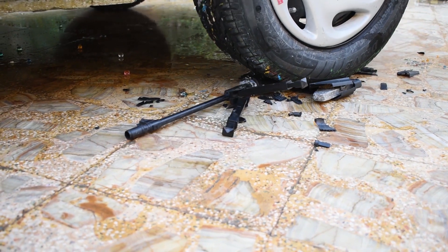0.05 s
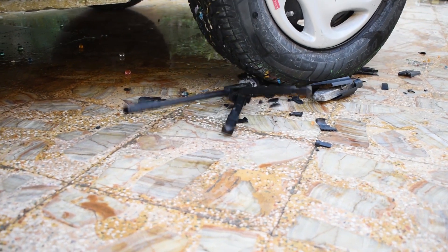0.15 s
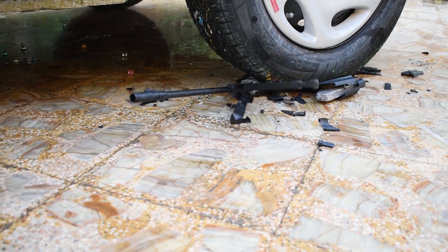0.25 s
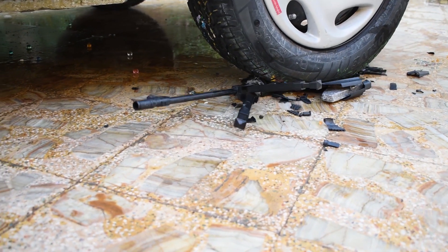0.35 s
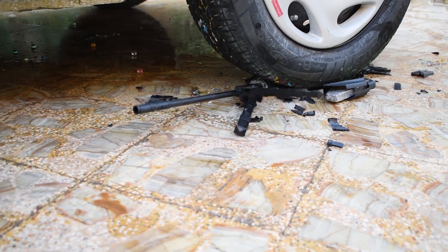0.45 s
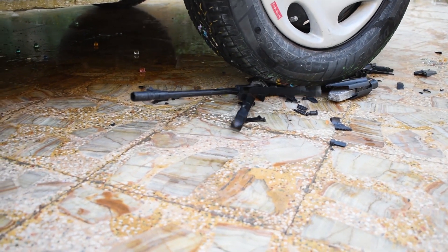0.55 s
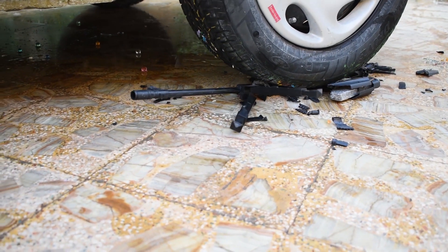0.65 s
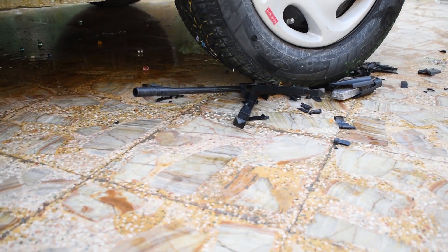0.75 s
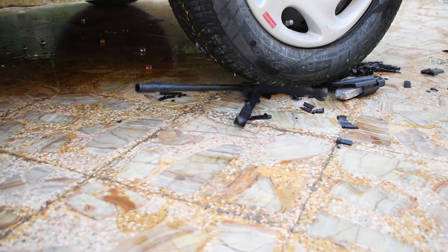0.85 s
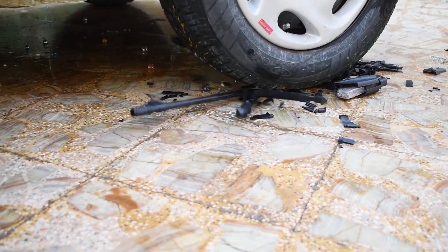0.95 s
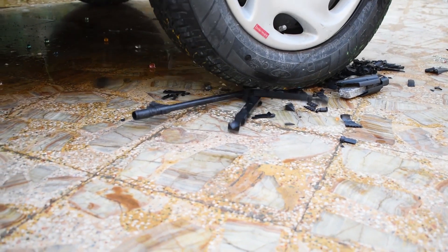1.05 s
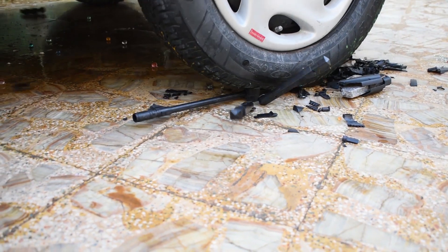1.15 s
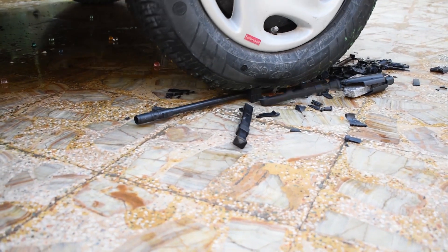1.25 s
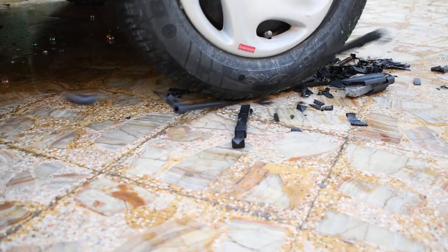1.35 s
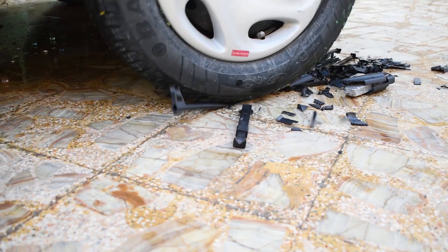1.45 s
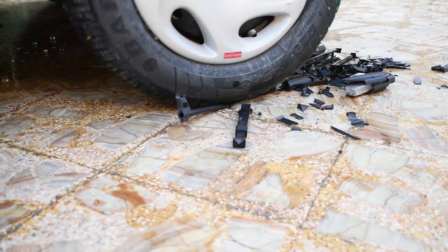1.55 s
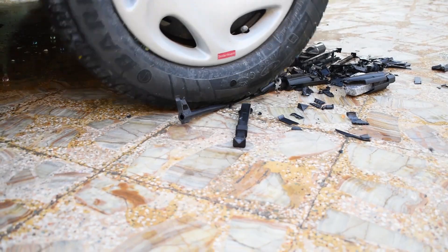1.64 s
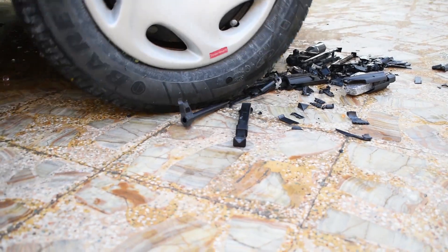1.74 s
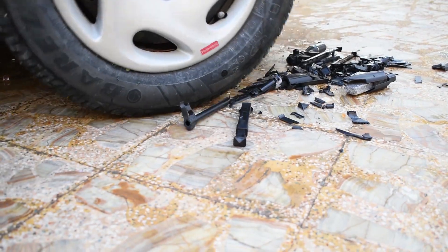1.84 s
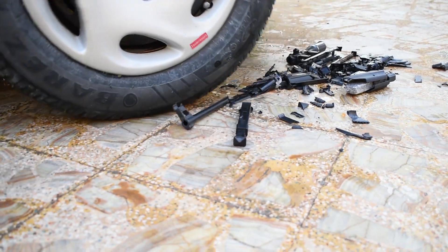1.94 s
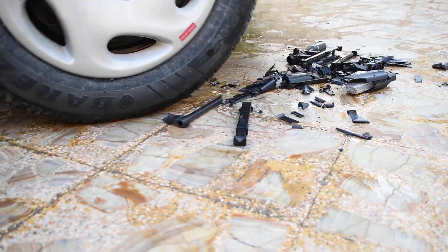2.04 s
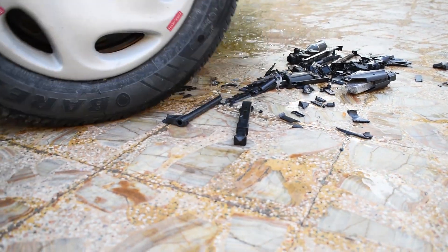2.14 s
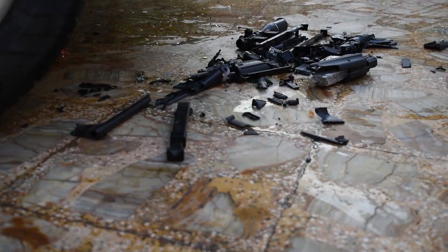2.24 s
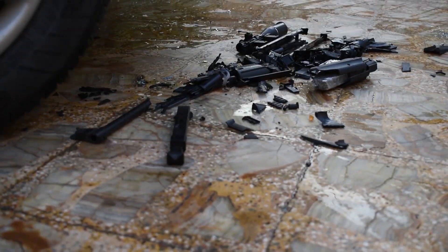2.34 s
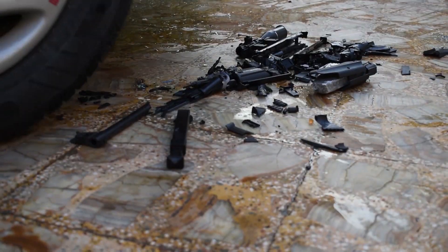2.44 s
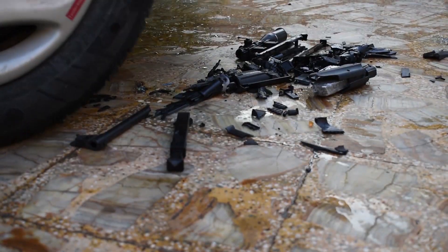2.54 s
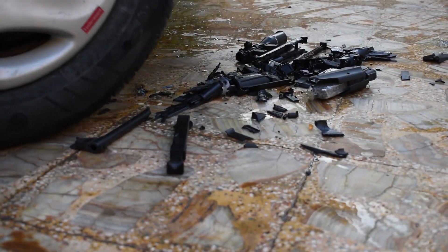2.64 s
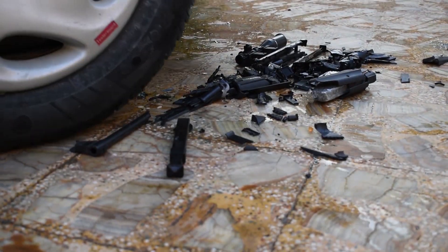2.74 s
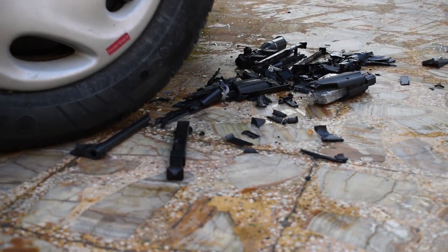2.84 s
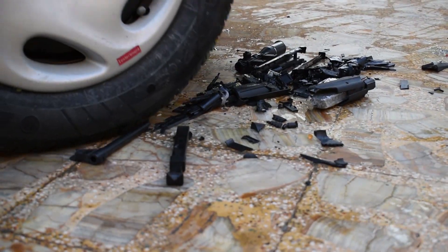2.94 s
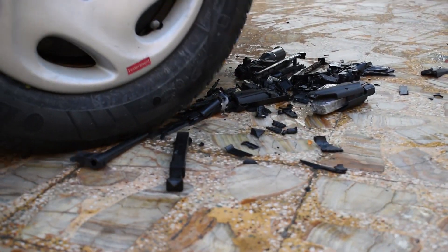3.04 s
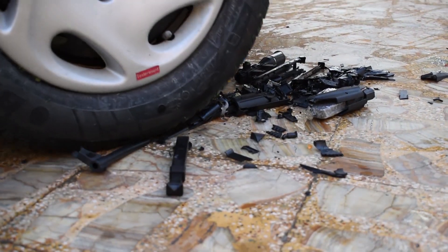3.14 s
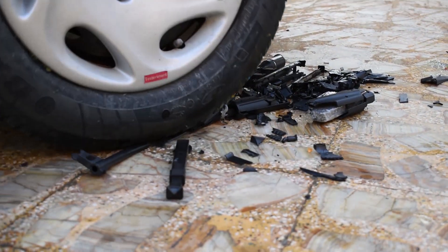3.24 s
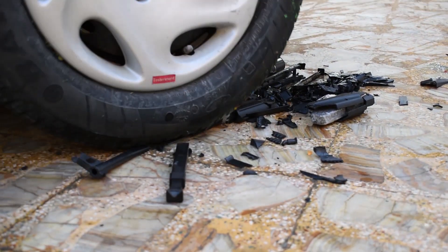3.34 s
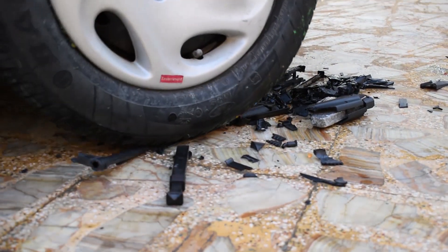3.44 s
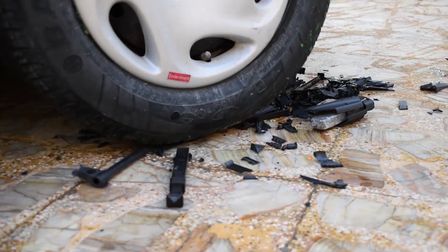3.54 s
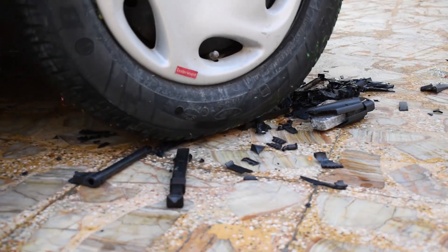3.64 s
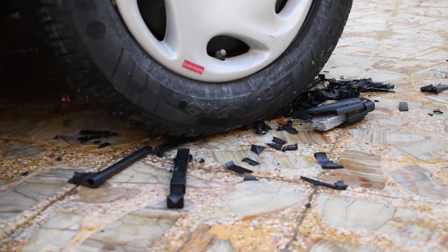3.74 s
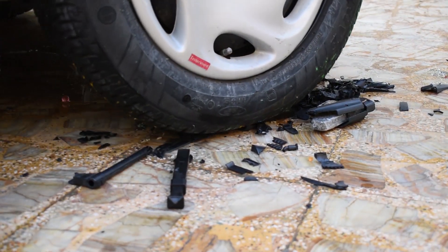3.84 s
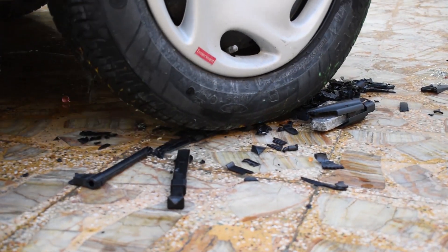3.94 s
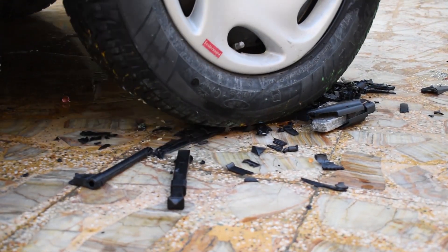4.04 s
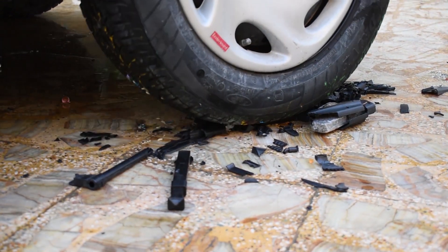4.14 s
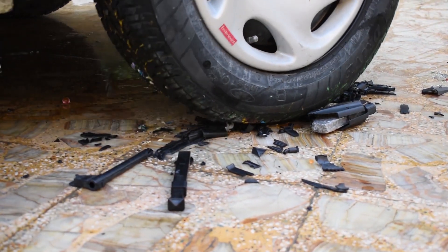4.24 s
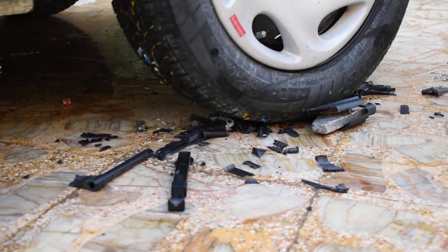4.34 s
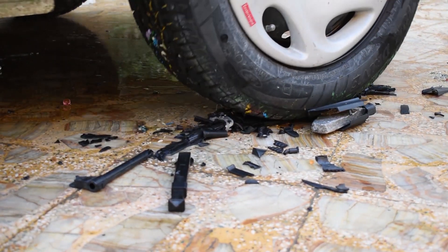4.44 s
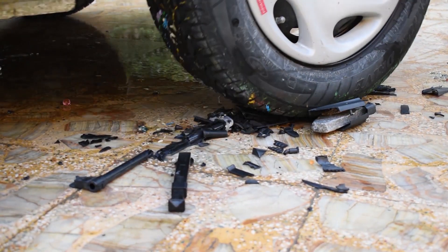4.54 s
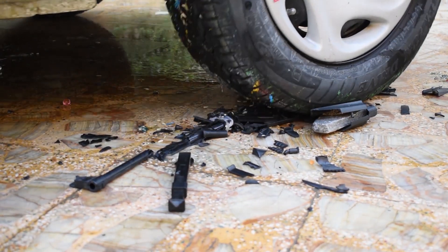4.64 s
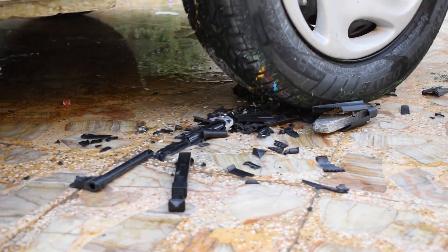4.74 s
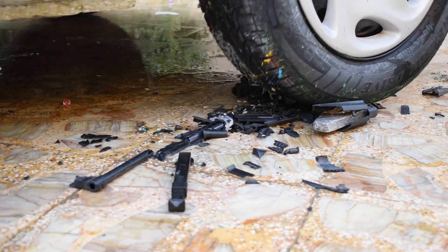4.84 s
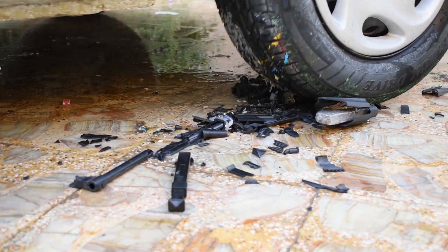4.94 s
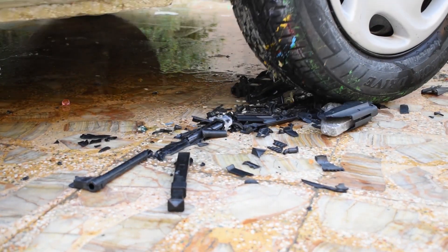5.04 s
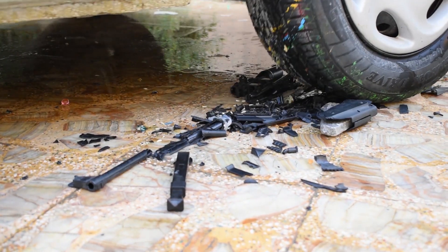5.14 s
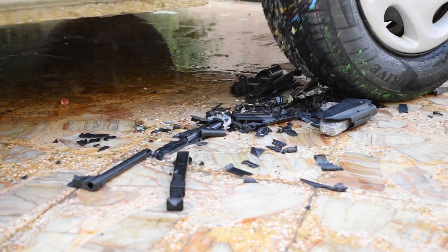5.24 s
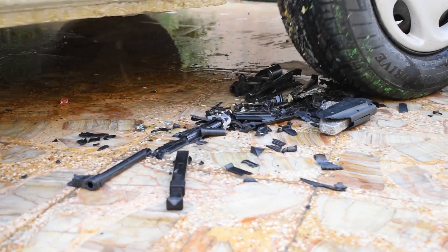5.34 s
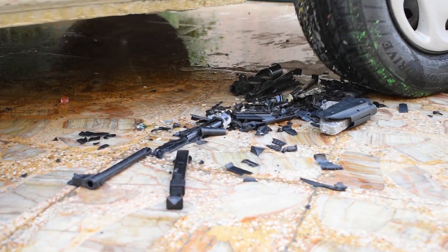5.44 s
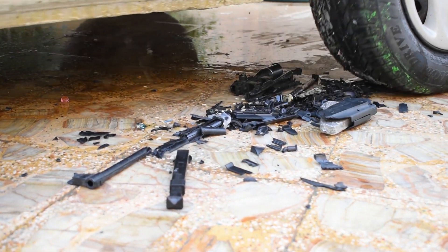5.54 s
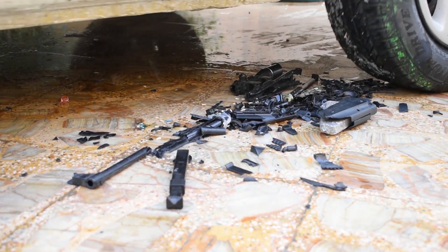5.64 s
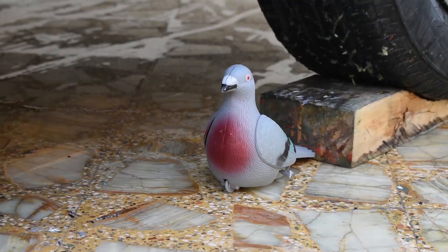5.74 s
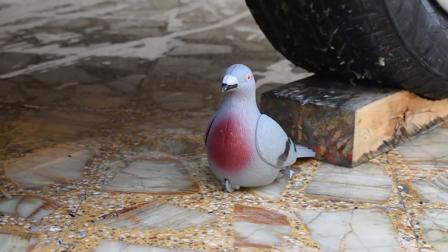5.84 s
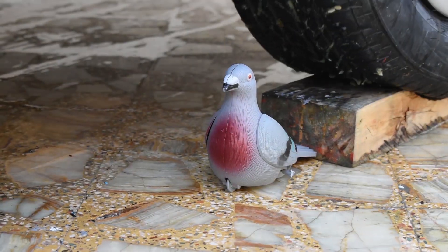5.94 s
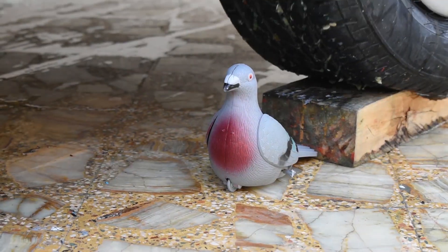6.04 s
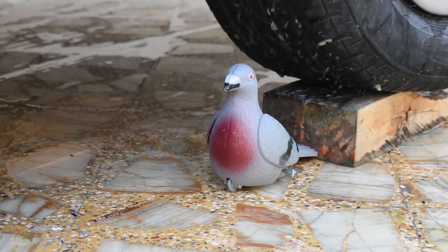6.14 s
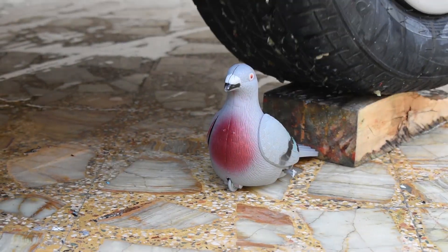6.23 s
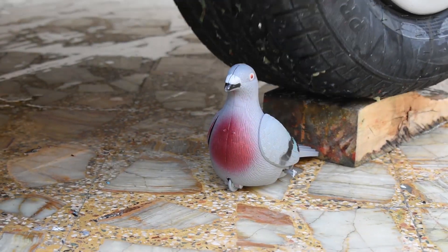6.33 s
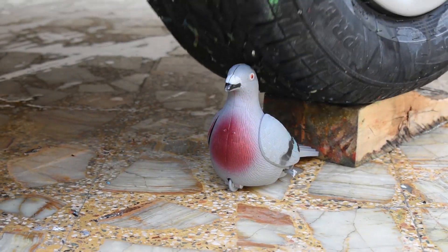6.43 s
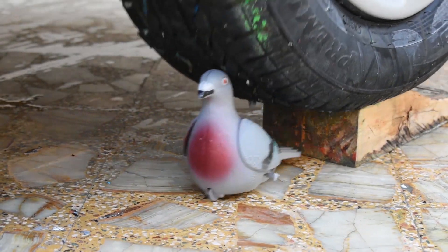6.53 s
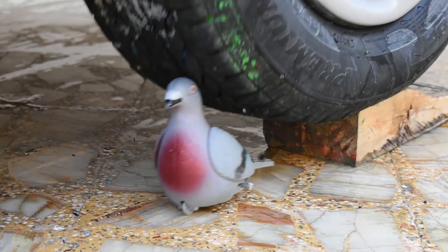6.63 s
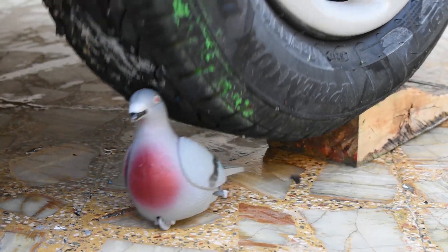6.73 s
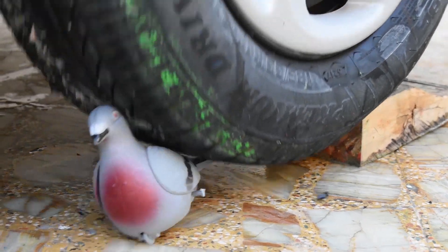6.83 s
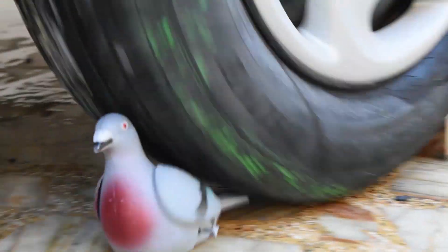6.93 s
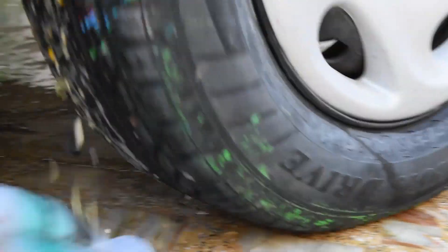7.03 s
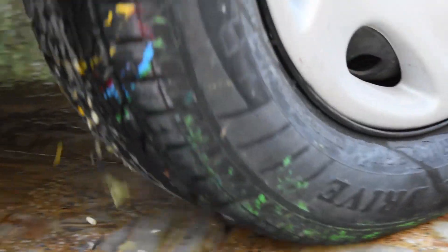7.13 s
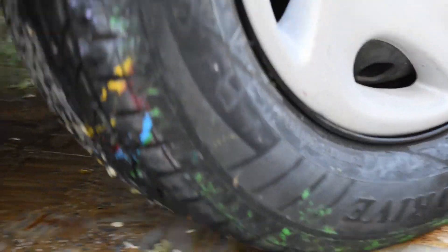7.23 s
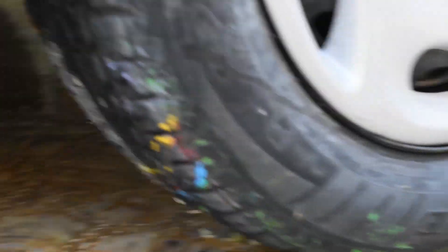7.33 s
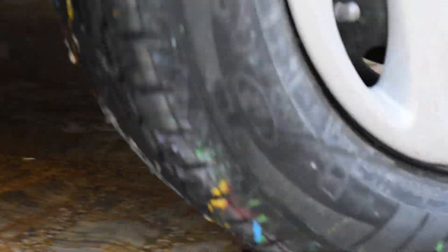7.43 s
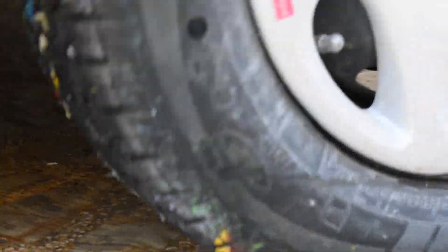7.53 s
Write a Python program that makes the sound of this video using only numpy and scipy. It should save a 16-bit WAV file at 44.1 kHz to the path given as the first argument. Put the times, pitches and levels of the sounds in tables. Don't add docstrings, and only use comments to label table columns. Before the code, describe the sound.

A car tyre creeps over brittle plastic toys on stone tiles, with loud pops, cracks and snapping chips over a low engine hum.

```python
import sys
import numpy as np
from scipy import signal
from scipy.fft import rfft, irfft, next_fast_len
from scipy.io import wavfile
from scipy.ndimage import uniform_filter1d

SR = 44100
rng = np.random.default_rng(int(sys.argv[2]) if len(sys.argv) > 2 else 0)


def volts_from_decibels(level):
    exponent = np.asarray(level, float) / 20
    return 10 ** exponent


def dump(signal):
    limited = np.clip(np.atleast_2d(signal).T, -1, 1)
    pcm = np.round(limited * 32767).astype(np.int16)
    wavfile.write(sys.argv[1], SR, pcm)


N = 334273
T = np.arange(N) / SR
# (time [s], firing rate [Hz], roar level [dB])
FIRING = [
    [(0, 65.12, -44), (.78998, 66.58, -46)],
    [(.79, 63.93, -45), (1.2, 60.5, -46), (2.0, 62.8, -48), (2.265, 61.37, -49)],
    [(2.268, 35.94, -55), (3.85, 31.08, -53), (4.25, 45.24, -47.5), (4.9, 55, -47), (5.5, 48.22, -49.5),
     (5.776, 48.86, -51)],
    [(5.806, 69.22, -43), (6.4, 70.5, -43), (6.51, 72.25, -43), (6.66, 65.47, -43.5), (6.9, 60.5, -46),
     (7.1, 55.47, -44), (7.58, 43, -48)],
]


def unit(x):
    return x / np.sqrt(np.mean(x ** 2) + 1e-20)


def takes(tables):
    s, *cols = np.concatenate(tables).T
    gate = sum((T >= rows[0][0]) & (T <= rows[-1][0]) for rows in tables)
    return [np.interp(T, s, c) for c in cols] + [gate]


def ring(f, hz, width):
    return 1j * f * width / (hz * hz - f * f + 1j * f * width)


def filtered(x, response):
    m = next_fast_len(x.shape[-1] + 1024)
    return irfft(rfft(x, m) * response(np.fft.rfftfreq(m, 1 / SR)), m)[..., :x.shape[-1]]


def wobble(rate, shape=(1, N)):
    knots = rng.standard_normal((shape[0], int(shape[1] * rate / SR) + 4))
    part, whole = np.modf(np.arange(shape[1]) * rate / SR)
    whole = whole.astype(int)
    return knots[:, whole] * (1 - part) + knots[:, whole + 1] * part


def place(seconds, rows):
    at = np.round(seconds * SR).astype(int)[:, None] + np.arange(rows.shape[1])
    return np.bincount(at.ravel(), rows.ravel(), N + SR)[:N]


def bursts(db, response, room, tear, tail_db, t60, lumpy_db, tail_lumps=0.22, release=0):
    t = np.arange(SR // 8) / SR
    head_n = SR // 25
    white = rng.standard_normal((len(db), len(t)))
    lumps_db = lumpy_db * wobble(600, (len(db), len(t)))
    noise = white * volts_from_decibels(lumps_db)
    near = volts_from_decibels(-60 * t / (t60 * (tear / 0.0016) ** 0.042))
    fade = near + 0.17 * volts_from_decibels(-60 * t / (5.6 * t60))
    tearing = (noise * np.exp(-(t / tear) ** 1.5) * np.tanh(6 * t / tear))[:, :head_n]
    jolt = np.exp(-((t[:head_n] - .0005 - .3 * tear) / 0.000097) ** 2)
    tearing += release * np.sqrt(SR * tear) / 9 * jolt
    head = filtered(tearing, response)
    onset = 1 - np.exp(-t / 0.00076)
    echoes = filtered(white * volts_from_decibels(tail_lumps * lumps_db) * fade * onset, room)
    size = lambda rows: np.sqrt(np.sum(rows ** 2, axis=1, keepdims=True))
    rows = volts_from_decibels(tail_db) * echoes / size(echoes)
    rows[:, :head_n] += head / size(head)
    return rows * volts_from_decibels(db)[:, None] * np.sqrt(SR * tear + 30)


def engine():
    # (multiple of firing rate [1], level [dB])
    orders = [(2, -17), (3, -10), (4, -6), (5, -26.5), (3.5, -19.5), (8, -13), (8.5, -14), (9, -13)]
    # (frequency [Hz], density [dB per Hz])
    roar_spectrum = [(53, -20.5), (100, -21), (125, -11), (210, -3), (620, -13), (1270, -9.5), (5300, -23),
                     (16000, -69.5)]
    # (firing rate [Hz], hum level [dB])
    cavity = [(34, -60), (44, -65), (49, -49.5), (55, -39.5), (60, -44.5), (65, -40), (70, -41.5),
              (72.3, -51)]
    nearness_db = [-2.5, 0.5, 0.5, 0.5]
    hz, roar_db, gate = takes(FIRING)
    take = np.searchsorted([rows[0][0] for rows in FIRING[1:]], T)
    hum_db = np.interp(hz, *np.transpose(cavity)) + np.array(nearness_db)[take]
    turn = 2 * np.pi * np.cumsum(hz * (1 + .003 * wobble(14)[0])) / SR + np.pi * (T > FIRING[1][0][0])
    hum = volts_from_decibels(hum_db + 1.2 * wobble(5.4)[0]) * np.sqrt(2) * np.sin(turn)

    below = 56 - hz
    lift_db = {2: 0.75 * np.abs(below - 0.77 * np.clip(below, None, 0)),
               5: 0.46 * np.clip(50 - hz, 0, None)}
    tones = 0
    for k, db in orders:
        drift_db = 2.5 * wobble(4.7)[0]
        tones = tones + volts_from_decibels(db + drift_db + lift_db.get(k, 0)) * np.sin(k * turn + k * k)

    cycle = np.linspace(0, 2 * np.pi, 4096)
    shape = sum(volts_from_decibels(3 * rng.standard_normal()) * np.sin(k * cycle + k * k) for k in range(5, 40))
    lines = .25 * unit(np.interp(turn / 2 % (2 * np.pi), cycle, shape))
    pulsing = volts_from_decibels(0.96 * np.sin(turn) + 0.78 * wobble(18)[0])
    noise = rng.standard_normal(N) * pulsing + lines
    f0, level = np.transpose(roar_spectrum)
    body = lambda f: 1 + 1.4 * ring(f, 638, 50) + 0.26 * ring(f, 1400, 200) + 0.47 * ring(f, 4600, 600)
    tilt = lambda f: volts_from_decibels(np.interp(np.log(f + 1), np.log(f0), level, left=-60))
    roar = unit(filtered(noise, lambda f: body(f) * tilt(f)))

    slow = 59 - hz
    rumble = unit(filtered(rng.standard_normal(N), lambda f: ring(f, 98, 140)))
    bright = filtered(roar, lambda f: ring(f, 3050, 1600) + ring(f, 15000, 9000))
    roar = roar - np.clip(slow / 45, 0, .8) * bright
    hiss = unit(filtered(rng.standard_normal(N), lambda f: ring(f, 8000, 9070) ** 3))
    flow = roar + volts_from_decibels(-11.5 + 0.44 * slow) * rumble + volts_from_decibels(-31.5 - 0.5 * slow) * hiss
    return gate * (hum + volts_from_decibels(roar_db) * (tones + flow))


def grit():
    # (time [s], level [dB])
    grinding = [
        [(0, -45.5), (.6, -57), (1.2, -49), (2.265, -54.5)],
        [(3.04, -84.5), (3.4, -63), (3.6, -53.5), (4.7, -44.5), (5.4, -45), (5.776, -57)],
        [(6.55, -62), (6.9, -58), (7.1, -42.5), (7.3, -59), (7.58, -58)],
    ]
    level_db, gate = takes(grinding)
    chance = 260 * volts_from_decibels(5 * wobble(25)[0]) / SR
    impacts = (rng.random(N) < chance) * volts_from_decibels(1.5 * rng.exponential(1, N))
    t = np.arange(SR // 30) / SR
    smear = volts_from_decibels(-60 * t / 0.0074) + 0.11 * volts_from_decibels(-60 * t / 0.023)
    shape = signal.fftconvolve(impacts, smear)[:N]
    colour = lambda f: ring(f, 4600, 2800) + 11.0 * ring(f, 550, 700) + 0.04 * ring(f, 11000, 7000)
    return gate * volts_from_decibels(level_db) * unit(filtered(shape * rng.standard_normal(N), colour))


def ticks():
    # (time [s], level [dB], grain mode [Hz])
    grains = [(0.0052, -28, 5080), (0.5209, -31, 4280), (0.5977, -28, 6570), (0.8029, -37.5, 9280),
              (0.8832, -17, 4480), (0.9408, -31, 5420), (1.1356, -25, 12550), (1.1652, -34, 3615),
              (1.2437, -33, 5780), (1.466, -27.5, 5060), (1.5072, -35, 5840), (1.5318, -27, 8990),
              (1.696, -36, 3420), (1.9357, -38, 4040), (2.0058, -39, 5090), (2.0277, -33.5, 4460),
              (2.078, -44, 7240), (2.0901, -36, 4720), (2.147, -44.5, 7720), (3.0814, -38, 5020),
              (3.428, -46.5, 12790), (3.4727, -42, 8250), (3.5533, -46, 2090), (3.7556, -43.5, 4870),
              (3.7868, -35, 4390), (3.925, -29.5, 5580), (4.0749, -39, 4550), (4.1409, -40, 5320),
              (4.1472, -49, 6550), (4.3662, -42, 2000), (4.4236, -43, 10640), (4.428, -36, 5020),
              (4.5294, -41.5, 4820), (4.6792, -22.5, 6240), (4.406, -26, 1086), (5.012, -33, 4490),
              (5.1102, -34, 4560), (5.142, -34, 3600), (5.4184, -34, 5340), (5.4906, -26.5, 1950),
              (5.5374, -30, 2300), (5.5867, -42, 2500), (5.6619, -38.5, 8470), (6.6013, -50.5, 2100),
              (1.4689, -28.5, 10380), (1.4801, -30, 8200), (6.954, -46.5, 3010), (6.9602, -40, 4480),
              (7.0737, -41, 5230), (7.0943, -39, 3490), (7.3717, -39, 2300), (7.4194, -41, 4690),
              (7.4287, -38.5, 2390), (7.441, -43, 2180), (7.4467, -38, 2150), (1.5237, -18.5, 11540),
              (4.2822, -21.5, 1150), (7.5318, -42, 2330), (5.2559, -37, 7210), (5.484, -29.5, 4970)]
    s, db, hz = np.transpose(grains)
    hz = hz[:, None]
    width = 0.083 * hz * np.maximum(hz / 5000, 1) ** 2
    click = 0.14 * np.minimum(hz / 5000, 1) ** 2
    grain = lambda f: ring(f, hz, width) + click * ring(f, 5000, 12000) ** 2
    tear = np.full((len(s), 1), .0007)
    rows = bursts(db - 5.0, grain, grain, tear, tail_db=-0.5, t60=0.039, lumpy_db=5.0, tail_lumps=.4)
    return place(s, rows)


def breaks():
    # (time [s], level [dB], shard mode [Hz], tear [ms])
    cracks = [(0.0533, -5.5, 3630, 2.4), (0.0707, -19, 4520.0, 8.7), (0.0937, -20, 3050, 0.8),
              (0.099, -18.5, 2960.0, 0.78), (0.1992, -6.5, 3684, 5.3), (0.4253, -18.5, 4310, 0.99),
              (0.4799, -8, 4200, 2.3), (0.6641, -19.5, 4650, 4), (1.2975, -24.5, 3826, 4.2),
              (1.5512, -10, 4440, 1.1), (1.6578, -29, 5400, 0.45), (3.791, -26.5, 2960, 2.1),
              (3.8539, -22, 4500, 1.4), (4.0904, -25, 4360, 0.76), (4.6605, -11, 4760, 0.55),
              (5.049, -18.5, 4020, 3.5), (5.1143, -20.5, 5400, 1.2), (5.3885, -21, 8400, 1.2),
              (5.399, -22, 4040, 0.54), (5.423, -14, 5060, 3.9), (5.4655, -15.5, 5220, 0.79),
              (5.7233, -33.5, 4540, 3.9)]
    # (time [s], level [dB], shard mode [Hz], tear [ms])
    brittle_cracks = [(0.1614, -21, 4260, 1.9), (0.3714, -21, 4430, 3.3), (0.4664, -24, 4670.0, 0.57),
                      (0.555, -16, 4460.0, 2.1), (0.604, -17, 4900, 1.6), (0.871, -22.5, 4700, 0.59),
                      (0.9066, -15.5, 4700, 0.5), (0.9107, -24, 4330, 2.8), (1.0392, -11, 4300, 0.69),
                      (1.2794, -29.5, 3830, 0.59), (1.7337, -26, 4670, 0.68), (1.737, -33, 4670, 2.6),
                      (3.1171, -18.5, 4830, 3.7), (3.4963, -26.5, 5570, 1.7), (4.0843, -31, 2210.0, 0.67),
                      (4.105, -37, 6100, 1.3), (4.186, -32, 6100, 2.6), (4.441, -25, 5140, 0.89)]
    # (time [s], level [dB], shell mode [Hz], tear [ms])
    shatters = [(.857, -29, 920, 0.99), (0.8608, -23.5, 934, 1.3), (1.104, -19.5, 1900, 1),
                (1.141, -18, 1545, 0.43), (1.148, -29.5, 840, 1.1), (1.402, -19, 1005, 1.9),
                (1.406, -22.5, 557, 5.3), (1.427, -16, 717, 0.91), (1.474, -21.5, 1010, 2.5),
                (1.4995, -28, 590, 0.89), (1.5117, -27.5, 405, 1.2), (3.393, -38.5, 660, 1.7),
                (4.9186, -40, 880, 0.92)]
    # (time [s], level [dB], shell mode [Hz], tear [ms])
    splits = [(0.013, -27.5, 820, 3.5), (0.062, -21, 1240, 2), (0.1478, -25, 890, 6.2),
              (0.155, -25, 1170, 0.94), (0.2057, -6.5, 806, 5.5), (0.558, -27, 770, 8.7),
              (0.6364, -17.5, 845, 5.26), (1.0867, -27.5, 517, 1.4), (1.3747, -17, 830, 1.8),
              (1.5358, -28, 1200, 2), (1.6182, -33, 790, 0.5), (1.8781, -33, 1153, 2.7),
              (3.4979, -28.5, 815, 1.1), (3.5772, -26.5, 870, 1.2), (3.636, -28.5, 547, 1.9),
              (3.8436, -30, 972, 9.2), (3.9299, -15.5, 968, 6), (4.096, -31, 1010, 3.6),
              (4.475, -18.5, 740, 4.4), (4.9477, -30.5, 975, 5.8), (5.0663, -21.5, 1112, 0.2),
              (5.1734, -12.5, 940, 0.59), (7.2318, -34, 1520, 1)]
    # (time [s], level [dB], shell mode [Hz], tear [ms])
    open_splits = [(0.0769, -22.5, 875, 5.2), (0.1432, -21.5, 674, 1.5), (0.4414, -22.5, 780, 0.15),
                   (0.5614, -23.5, 860, 2.3), (0.6066, -32.5, 870, 11), (0.8144, -28, 690, 2.8),
                   (0.975, -12.5, 627, 10), (1.3656, -27, 641, 4.7), (1.4504, -16.5, 559, 2),
                   (1.4877, -23, 404, 0.93), (1.771, -26, 1534, 2.66), (1.8465, -36, 1297, 17),
                   (1.8653, -25.5, 1770, 1.9), (3.571, -26.5, 1030, 1.9), (3.6561, -36.5, 970, 14),
                   (3.864, -24, 890, 1.8), (4.5649, -17, 730, 1.9), (4.657, -19.5, 840, 0.84)]
    # (time [s], level [dB], shell mode [Hz], tear [ms])
    pops = [(.6499, -24, 815, 3.1), (0.8839, -28, 846, 15), (0.9176, -18, 870, 1.9),
            (1.3814, -5.5, 454, 11), (1.5236, -16, 532, 0.5), (3.2896, -13.5, 1530, 0.3),
            (3.2890, -25.5, 730, 0.32), (3.529, -22.5, 790, 1.06), (3.6472, -23.5, 1070, 1.4),
            (3.7213, -22, 1030, 2.1), (4.5547, -24, 740, 8.2), (4.5627, -16.5, 673, 2.4),
            (4.7883, -28, 674, 3.1), (4.965, -33.5, 940, 9.3), (5.3859, -20, 1300, 1.8),
            (5.5053, -9.5, 1280, 1)]
    # (time [s], level [dB], shell mode [Hz], tear [ms])
    knocks = [(1.6073, -20.5, 1370, 0.86), (1.6542, -22, 1170, 0.4), (1.713, -26, 1300, 1.9),
              (3.5642, -20.5, 1130, 0.29), (3.826, -27, 1010, 0.87), (4.171, -18, 820, 1.2),
              (4.247, -21, 766, 1.9), (4.2892, -9.5, 617, 2.3), (4.6183, -19.5, 640, 5.8),
              (4.7144, -17.5, 640, 2.5), (4.7684, -20, 980, 1.05), (4.8015, -20.5, 790, 2.1),
              (4.833, -19, 870, 2.3), (4.8715, -24.5, 634, 10.8), (5.1534, -24.5, 990, 2.4),
              (5.2334, -25.5, 2000, 0.89), (5.3261, -14.5, 1130, 0.14), (5.5925, -24.5, 1560, 2.4),
              (7.1181, -22, 1480, 3.6), (7.2742, -32.5, 2600, 1.7)]
    # (time [s], level [dB], shard mode [Hz])
    chips_out = [(0.3052, -28, 6050), (0.343, -36, 5810), (0.408, -37, 4170), (0.5493, -22, 4390),
                 (0.8444, -37, 10100), (1.1777, -25.5, 5920), (1.2264, -34.5, 2000), (1.4185, -20, 8480),
                 (1.5339, -22.5, 4960), (1.598, -34.5, 5300), (1.6133, -29, 4480), (1.684, -36, 4370),
                 (1.6953, -33, 3400), (1.75, -27, 4670), (1.863, -31, 3800), (1.89, -29.5, 6520),
                 (1.94, -39.5, 8150), (2.031, -34, 4870), (2.102, -36.5, 10600), (2.1293, -35.5, 4780)]
    # (time [s], level [dB], shard mode [Hz])
    chips_back = [(3.0642, -32, 4940), (3.0964, -31.5, 4100), (3.4198, -31, 2050), (3.479, -38, 4520),
                  (3.516, -28.5, 7240), (3.5416, -27.5, 2810), (3.56, -30, 4310), (3.5967, -30, 4440),
                  (3.629, -26.5, 6270), (3.6961, -34, 3450), (3.7408, -26, 5890), (3.8036, -30.5, 4610),
                  (3.905, -24.5, 4500), (3.9135, -32, 7800), (4.0033, -29.5, 2840), (4.0266, -33, 4720),
                  (4.0416, -28, 5020)]
    # (time [s], level [dB], shard mode [Hz])
    chips_pile = [(4.1982, -35, 4480), (4.2768, -29, 4520), (4.2838, -31, 12190), (4.3052, -26, 3270),
                  (4.3643, -37, 2000), (4.4035, -33, 9110), (4.4695, -38, 6850), (4.5391, -41, 10470),
                  (4.6116, -25.5, 10260), (4.644, -22, 2020), (4.8463, -26, 2110), (4.982, -30.5, 3950),
                  (5.0041, -34.5, 4700), (5.0732, -25.5, 7140), (5.1467, -24.5, 3340),
                  (5.274, -38.5, 12500), (5.2855, -27.5, 2225), (5.6241, -34, 6550), (5.6622, -39.5, 8530),
                  (7.3025, -31, 3900), (7.3109, -37, 5580)]
    # (crack [dB], shell [dB], fizz [dB])
    kind_levels = [
        (-3.5, -13, -12.5),
        (0.2, -11.5, -1),
        (-4.5, -5, 5.5),
        (-2, -3, -10),
        (-1, -2, -4),
        (-6, -2.34, -6.5),
        (-9, 0.1, -16),
        (-1.5, -2.5, -9),
    ]
    chip_tear_ms = 0.71
    chips = [(s, db, hz, chip_tear_ms) for s, db, hz in chips_out + chips_back + chips_pile]
    kinds = [cracks, brittle_cracks, shatters, splits, open_splits, pops, knocks, chips]
    thin_walled = [True, True, False, False, False, False, False, True]
    rows = []
    for kind, levels, thin in zip(kinds, kind_levels, thin_walled):
        rows += [(*row, *levels, thin) for row in kind]
    return np.array(rows).T


def snaps():
    s, db, hz, tear_ms, crack_db, shell_db, fizz_db, thin = breaks()
    thin = thin.astype(bool)
    shell_hz = np.where(thin, 1000 + 200 * rng.standard_normal(len(s)), hz)[:, None]
    tear = np.clip(tear_ms[:, None], .3, 12) / 1000
    shards = 2400 * volts_from_decibels(8.5 * rng.random((len(s), 3)))
    shards[thin, :2] = hz[thin, None]

    main_hz = np.where(thin, hz, 4600)[:, None]
    shard_gain = np.where(thin, 1, .55)[:, None]
    shard_modes = lambda f: shard_gain * sum(ring(f, shards[:, [k]], 498) for k in range(3))
    modes = lambda f: 0.5 * ring(f, main_hz, 1300) + shard_modes(f)
    crack = lambda f: modes(f) * ring(f, 3500, 11000) ** 2 * (1 - 0.42 * ring(f, 2600, 900))
    scattered = lambda f: crack(f) + 1.2 * ring(f, 3200, 6000) ** 2

    fizz = lambda f: ring(f, 7900, 14000) ** 2 * (0.77 + ring(f, 2 * shards[:, [2]] + 3500, 1400))
    fizz_room = lambda f: fizz(f) * ring(f, 6000, 9000)

    over = shell_hz * rng.uniform(1.25, 1.8, (len(s), 1))
    dull = lambda f: 1 / (1 + 1j * f / 2300) ** 2
    first = lambda f: ring(f, shell_hz, (0.34 + .0001 / tear) * shell_hz) + 0.41 * ring(f, shell_hz, 60)
    upper = lambda f: 0.45 * ring(f, over, 350) + 0.22 * ring(f, 360, 1300) ** 2
    shell = lambda f: dull(f) * (first(f) + upper(f))
    hollow = lambda f: shell(f) + 0.41 * dull(f) * ring(f, 500, 1600) ** 2

    rows = bursts(db + crack_db - .5, crack, scattered, 0.39 * tear,
                  tail_db=-3.5, t60=0.054, lumpy_db=-1, tail_lumps=0.39)
    rows += bursts(db + fizz_db - .5, fizz, fizz_room, .5 * tear,
                   tail_db=-7.0, t60=0.02, lumpy_db=11.5, tail_lumps=0.81)
    rows += bursts(db + shell_db - 0.5, shell, hollow, 0.63 * tear,
                   tail_db=-3.5, t60=0.089, lumpy_db=11.0, tail_lumps=0.29, release=0.67)
    return place(s, rows)


def rings():
    # (time [s], level [dB], mode [Hz], t60 [s])
    loose_parts = [(.053, -16, 894, 0.04), (.076, -43, 960, 0.048), (0.469, -43, 920, 0.027),
                   (0.857, -26, 954, .04), (.975, -18, 920, 0.044), (1.178, -39.5, 1000, 0.049),
                   (1.501, -32, 620, 0.046), (1.551, -13.5, 3100, 0.0088), (1.551, -37, 4800, 0.049),
                   (1.684, -28, 1270, 0.025), (3.069, -44, 345, .08), (3.116, -36, 315, 0.095),
                   (3.115, -24, 5600, 0.017), (3.2896, -9, 1800, 0.0057), (3.2899, -22.5, 614, 0.022),
                   (3.2895, -16, 1010, 0.011), (3.305, -45, 1590, 0.032), (3.518, -30, 406, 0.03),
                   (3.572, -44, 1090, 0.095), (3.634, -34, 3420, 0.022), (3.646, -30.5, 1106, .05),
                   (3.66, -31, 1094, .05), (3.695, -40, 3450, 0.027), (3.741, -27, 1054, 0.034),
                   (3.929, -27.5, 1047, 0.19), (3.93, -31, 4680, 0.083), (3.931, -32, 232, 0.058),
                   (4.2462, -19.5, 870, 0.028), (4.290, -16, 1080, 0.063), (4.292, -29, 576, 0.13),
                   (4.339, -29, 1120, 0.032), (4.349, -30, 990, .04), (4.365, -35, 581, 0.049),
                   (4.563, -16.5, 750, 0.076), (4.7148, -12.5, 645, 0.021), (4.7155, -20, 690, 0.04),
                   (5.113, -31, 400, 0.048), (5.173, -41, 950, 0.054), (5.423, -29, 5090, .1),
                   (5.491, -28, 1330, 0.028), (5.505, -30, 1430, 0.23), (7.035, -24.5, 624, 0.049),
                   (7.037, -28, 867, 0.059), (7.118, -25.5, 2420, 0.014)]
    s, db, hz, t60 = np.transpose(loose_parts)[:, :, None]
    t = np.arange(SR // 5) / SR
    pair = np.sin(2 * np.pi * hz * t) + 0.12 * np.sin(2 * np.pi * 1.2 * hz * t)
    shake = volts_from_decibels(6.0 * wobble(150, (len(s), len(t))))
    onset = 1 - np.exp(-t / 0.00027)
    return place(s[:, 0], volts_from_decibels(db + 2 - 60 * t / t60) * pair * shake * onset)


def thuds():
    # (time [s], peak level [dB], boom [Hz])
    drops = [(0.206, -15, 147.5), (0.633, -23, 152.6), (.973, -8.5, 156.6), (1.39, -17.5, 38.04),
             (7.037, -20.5, 123), (1.381, -6, 331), (1.384, -13, 145), (3.929, -25.5, 152.3),
             (3.991, -25, 82), (4.29, -15, 300), (4.298, -21.5, 104), (4.563, -20, 368),
             (5.171, -18.5, 170), (7.118, -28, 80)]
    s, db, hz = np.transpose(drops)
    hz = hz[:, None]
    boom = lambda f: ring(f, hz, 43) + 0.31 * ring(f, 1.7 * hz, 100)
    tear = np.full((len(s), 1), .006)
    return place(s, bursts(db - 15.0, boom, boom, tear, tail_db=9.5, t60=0.16, lumpy_db=3.5, release=1.6))


def peel():
    # (start [s], end [s])
    puffs = [
        (6.645, 6.72),
        (6.755, 6.83),
        (7.0, 7.03),
        (7.165, 7.215),
        (7.44, 7.47),
    ]
    gate = uniform_filter1d(sum(1. * (T > start) * (T < end) for start, end in puffs), size=300)
    hiss = unit(filtered(rng.standard_normal(N), lambda f: ring(f, 13000, 7000) ** 3))
    return volts_from_decibels(-69 + 6 * wobble(120)[0]) * gate * hiss


def rubber():
    # (length [ms], level [dB], top frequency [Hz])
    drags = [
        (5.3, -35.5, 2700),
        (8.4, -25.5, 2700),
        (14, -37.5, 5000),
        (22.8, -41.5, 5100),
        (15.9, -36.5, 3050),
    ]
    drag_times = [6.93, 7.041, 7.07, 7.315, 7.388]
    squeak_start, squeak_end, squeak_db = 7.18, 7.275, -65
    thin = unit(filtered(rng.standard_normal(N), lambda f: ring(f, 9000, 120) ** 2))
    out = volts_from_decibels(squeak_db) * ((T > squeak_start) & (T < squeak_end)) * thin
    for s, (ms, db, top_hz) in zip(drag_times, drags):
        ragged = rng.standard_normal(N) * volts_from_decibels(3.6 * wobble(300)[0])
        rub = filtered(ragged, lambda f: ring(f, top_hz / 3, top_hz) ** 2)
        swell = np.exp(-((T - s) * 1000 / ms) ** 2)
        out += volts_from_decibels(db) * swell * unit(rub)
    return out


def scene():
    mix = engine() + grit() + ticks() + snaps() + rings() + thuds() + peel() + rubber()
    return (mix * takes(FIRING)[-1])[None]


def roll_off(x):
    return signal.sosfilt(signal.butter(12, 16540, fs=SR, output="sos"), x)


def record(dry):
    flat = dry / (1 + np.abs(dry) ** 8) ** (1 / 8)
    flat = filtered(flat, lambda f: 1 / (1 + (f / 15900) ** 60))
    return roll_off(flat)


dry = scene()
out = record(dry)
dump(out)
```